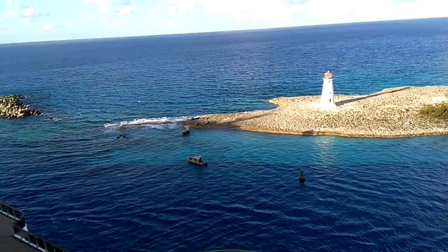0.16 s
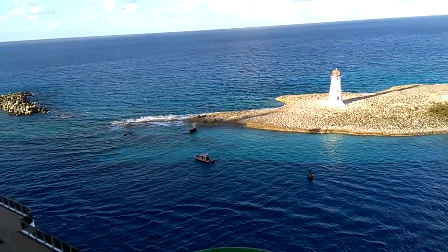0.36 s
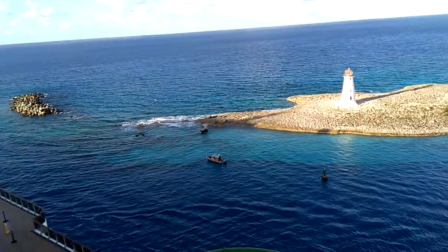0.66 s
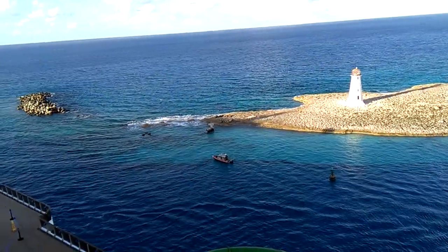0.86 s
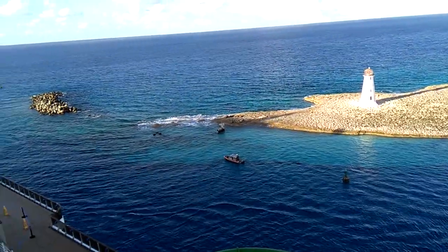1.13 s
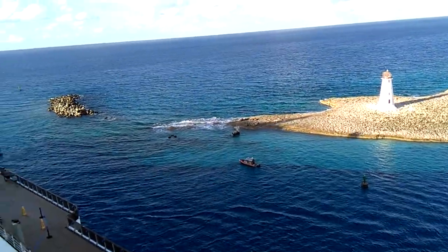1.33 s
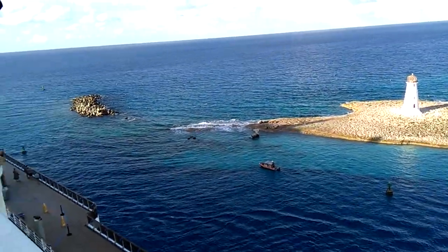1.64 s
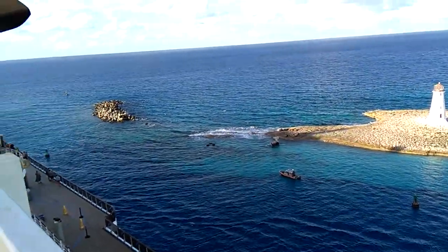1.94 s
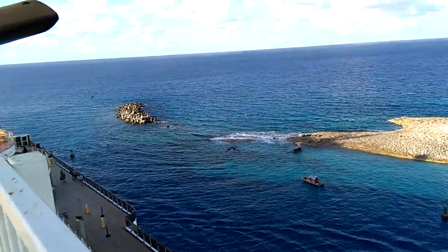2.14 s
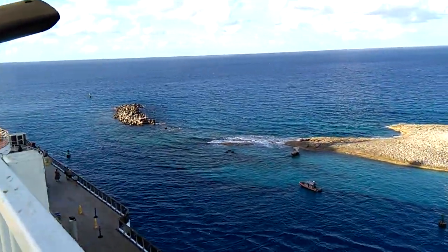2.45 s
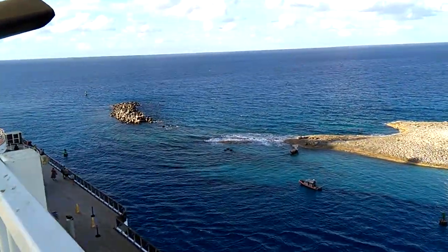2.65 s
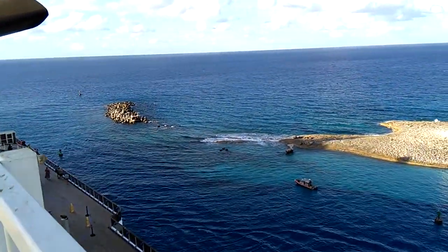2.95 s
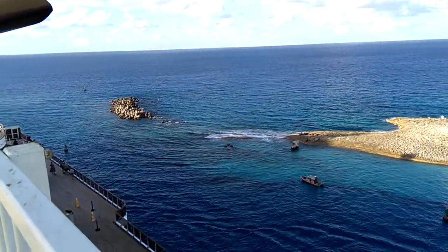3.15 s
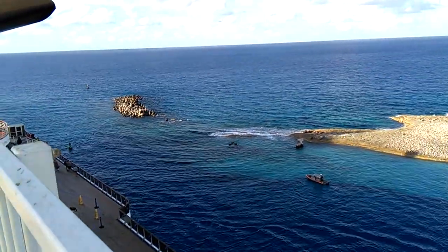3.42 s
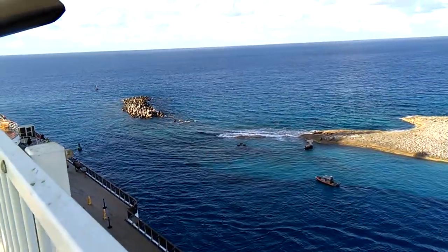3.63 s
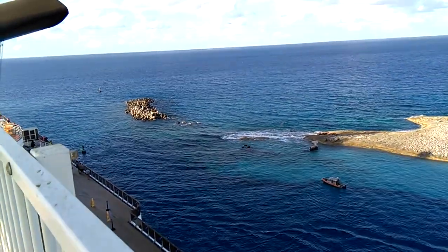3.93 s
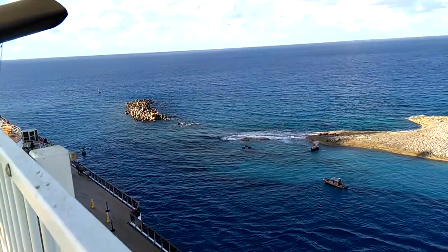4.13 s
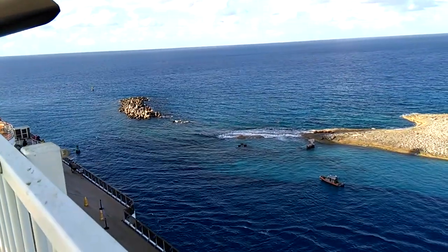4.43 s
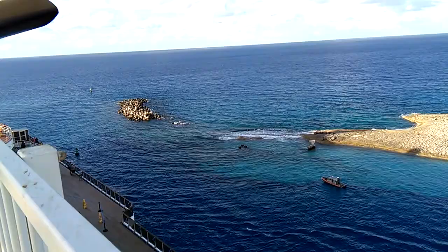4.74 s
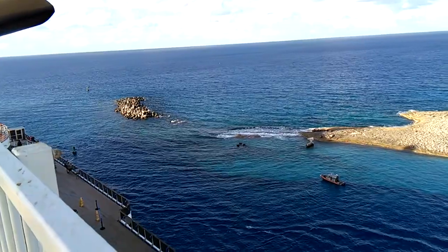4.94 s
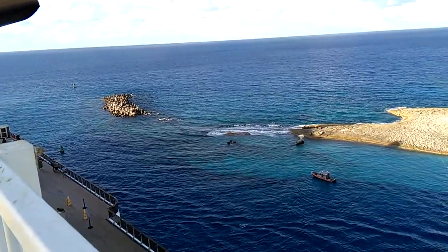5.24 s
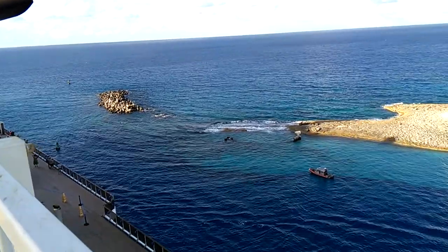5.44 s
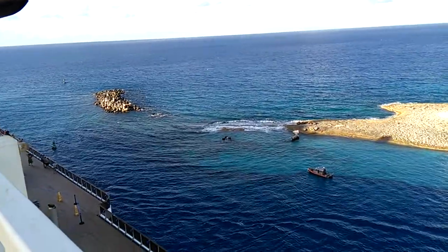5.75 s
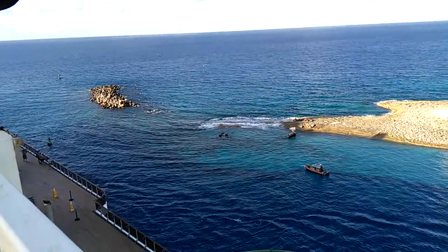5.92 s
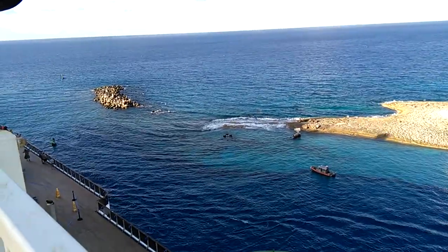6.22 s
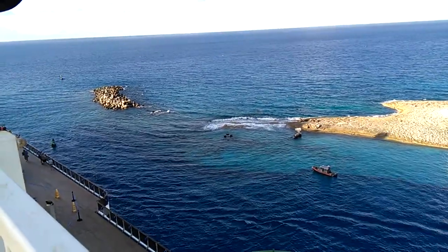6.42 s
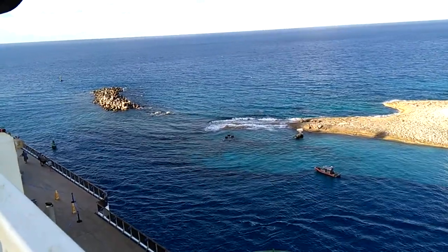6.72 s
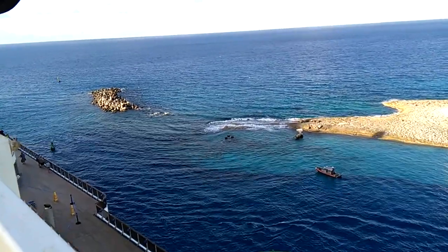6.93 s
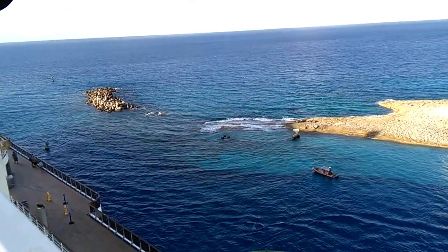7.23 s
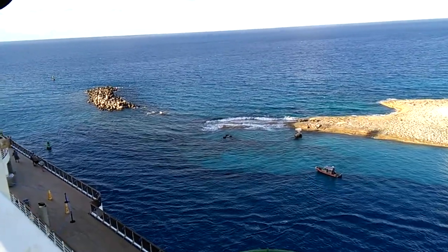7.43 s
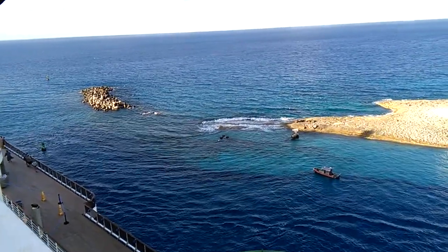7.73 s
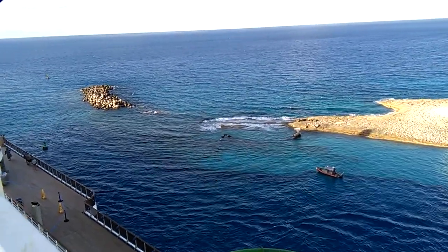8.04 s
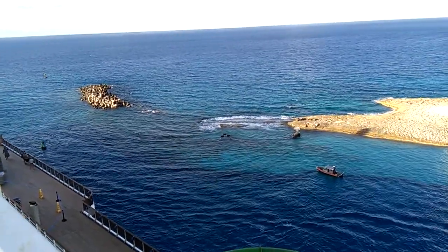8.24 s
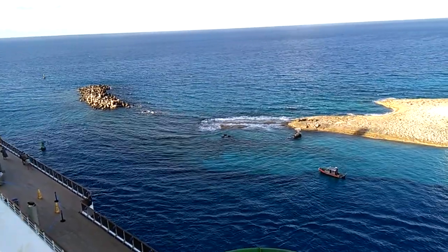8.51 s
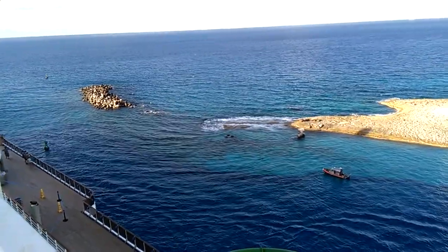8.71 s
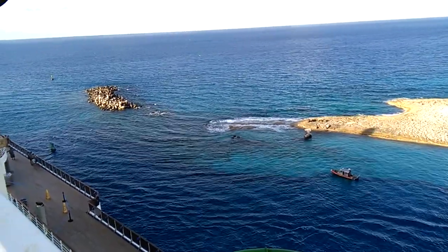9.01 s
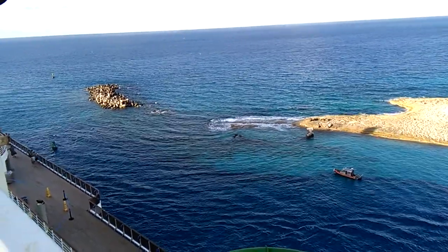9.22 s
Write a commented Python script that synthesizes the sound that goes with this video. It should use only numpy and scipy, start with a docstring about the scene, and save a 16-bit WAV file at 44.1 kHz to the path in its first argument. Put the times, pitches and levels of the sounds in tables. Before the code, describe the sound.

On the open deck of a ship, wind buffets a small microphone throughout with an uneven low rumble, soft thumps and hollow fluttering. A sharper, raspy gust hits about two seconds in, then a faint wavering whistle sounds for a second, followed by quick flaps of air. The ship's machinery hums quietly underneath, and near the end a distant wave washes very faintly.

```python
"""On the open upper deck of a ship at sea, wind buffets a small microphone.
Turbulence carries eddies of many sizes: large ones rumble and thump on the diaphragm, small ones
flutter, puff and flap across the port, which burbles and whistles by resonance.
The ship's machinery hums below; far off, water hisses and one wave breaks.
The recorder's limiter holds down the peaks."""
import sys
import numpy as np
from scipy import signal
from scipy.fft import rfft, irfft, next_fast_len
from scipy.io import wavfile
from scipy.ndimage import uniform_filter1d

SR = 44100
rng = np.random.default_rng(int(sys.argv[2]) if len(sys.argv) > 2 else 0)


def put_to_file(sound):
    """Save the sound as 16-bit audio at rate SR, in the file named by the first command-line argument."""
    columns = np.atleast_2d(sound).T  # one column per channel
    safe = np.clip(columns, -1, 1)
    whole_steps = np.round(safe * 32767)
    wavfile.write(sys.argv[1], SR, whole_steps.astype(np.int16))


N = 413216
ATTACK_SHARE = 0.6   # rise time over decay time of a burble, puff or flap
CHANCE_SPREAD_DB = 5.5   # range of level among chance events


def from_db(db):
    """Logarithmic level: every 20 dB is a factor of ten in amplitude."""
    return 10 ** (np.asarray(db) / 20)


def rms_one(x):
    """Normalisation to unit rms."""
    return x / np.sqrt(np.mean(x ** 2) + 1e-20)


def in_time(rows):
    """Linear interpolation: each column after the time, at every sample."""
    times, *columns = np.transpose(rows)
    return [np.interp(np.arange(N) / SR, times, column) for column in columns]


def drift(rate_hz):
    """A slow random process of unit rms: noise at every 40th sample through a two-pole low-pass."""
    pole = np.exp(-80 * np.pi * rate_hz / SR)
    noise = rng.standard_normal(N // 40 + 2002)
    slow = signal.lfilter([1], [1, -2 * pole, pole * pole], noise)[2000:]   # once the filter has settled
    return np.interp(np.arange(N) / 40, np.arange(len(slow)), rms_one(slow))


def band_noise(spectrum, shared_db, own_db, rate_hz):
    """Random amplitude modulation: third-octave bands swell partly together, partly alone; rms 1."""
    hz, level_db = np.transpose(spectrum)
    size = next_fast_len(N)
    bins = np.maximum(np.arange(size // 2 + 1) * SR / size, 1)
    shape_db = np.interp(np.log(bins), np.log(hz), level_db, left=-150, right=-150)
    coloured = rfft(rng.standard_normal(size)) * from_db(shape_db)
    together, out = drift(rate_hz), 0
    thirds = 3 * np.log2(bins / hz[0])
    for k in range(int(3 * np.log2(hz[-1] / hz[0])) + 2):
        weight = np.clip(1 - abs(thirds - k), 0, 1)   # overlapping slopes add up to 1
        band = irfft(coloured * weight, size)[:N]
        out = out + band * from_db(shared_db * together + own_db * drift(rate_hz))
    return rms_one(out)


def pulse(peak_s, length_s, attack=1):
    """Gaussian envelope as (samples, gains): -6 dB half a length after the peak; attack scales the rise."""
    at = np.arange(max(int((peak_s - 2 * length_s) * SR), 0), min(int((peak_s + 2 * length_s) * SR), N))
    away = 2 * (at / SR - peak_s) / length_s
    return at, from_db(-6 * np.where(away < 0, away / attack, away) ** 2)


def by_chance(count, *wind_db):
    """Uniformly random events: their times, a 0-1 draw each, and the wind levels there, randomly lowered."""
    when, draw, drop = rng.random((count, 3)).T
    at = (when * (N - 1)).astype(int)
    return at / SR, draw, *[db[at] - CHANCE_SPREAD_DB * drop for db in wind_db]


# Wind noise in four ranges: (time [s], rumble [dB], growl [dB], flutter [dB], rasp [dB])
WIND_LEVELS = [(0.0, -28.5, -35.5, -37.5, -57), (0.52, -25.5, -33.5, -37.5, -59.5),
               (1.12, -23.5, -35, -41.5, -52.5), (1.35, -22, -39.5, -43, -62.5),
               (1.84, -24.5, -35.5, -39, -57.5), (1.9, -25, -38.5, -33, -44),
               (2.2, -31.5, -38, -36.5, -49.5), (2.34, -28.5, -42, -40.5, -61),
               (2.58, -28.5, -42.5, -41, -61.5), (3.18, -27.5, -37.5, -40, -56),
               (4.3, -25.5, -35.5, -36.5, -51), (4.45, -29, -40, -37.5, -53.5),
               (5.37, -22.5, -38.5, -38, -51), (5.72, -31.5, -36, -36, -55), (6.05, -25, -36.5, -40, -61.5),
               (6.72, -30, -35, -40, -59), (7.28, -28, -32, -40.5, -58), (7.57, -24, -37, -37.5, -55),
               (8.79, -30.5, -37, -43.5, -63), (9.37, -28, -34, -37, -55.5)]
# Spectra of those ranges, largest eddies first: (frequency [Hz], relative density [dB])
RUMBLE_SPECTRUM = [(22, -41), (32, -25.5), (42, -2.5), (50, -0.5), (60, -3), (75, -2.5), (100, -8.5),
                   (150, -11), (230, -16)]
GROWL_SPECTRUM = [(90, -14.5), (140, -17.5), (230, 3), (330, 3), (480, -12)]
FLUTTER_SPECTRUM = [(300, -13), (420, 0), (530, -1.5), (700, -6), (1000, -13), (1400, -35)]
RASP_SPECTRUM = [(800, -6.5), (1100, 7.5), (1500, 4), (2000, -7), (2700, -25), (3600, -44.5)]
def buffeting():
    """Turbulent pressure fluctuation at the port: the smaller the eddy, the higher its frequencies."""
    rumble_db, growl_db, flutter_db, rasp_db = in_time(WIND_LEVELS)
    rumble = from_db(rumble_db) * band_noise(RUMBLE_SPECTRUM, shared_db=2.4, own_db=2, rate_hz=13)
    growl = from_db(growl_db) * band_noise(GROWL_SPECTRUM, shared_db=3, own_db=1, rate_hz=11)
    streaks = drift(22)   # one eddy brightens the whole middle range at once
    flutter = band_noise(FLUTTER_SPECTRUM, shared_db=-1.5, own_db=2.5, rate_hz=25)
    flutter *= from_db(flutter_db + 2.18 * streaks)
    rasp = band_noise(RASP_SPECTRUM, shared_db=1, own_db=4.5, rate_hz=34)
    rasp *= from_db(rasp_db + 1.1 * streaks)
    return rumble + growl + flutter + rasp


def wavering_tone(hz, wander_hz, rate_hz):
    """Random frequency modulation of a sine; rms 1."""
    pitch_hz = hz + wander_hz * drift(rate_hz)
    return np.sqrt(2) * np.sin(2 * np.pi * np.cumsum(pitch_hz) / SR)


# Spectral lines of the machinery: (frequency [Hz], rms wander [Hz], relative level [dB])
HUM_LINES = [(177.9, 2.5, 1), (207.4, 0.93, -4)]
# The lower line comes and goes; the upper stays near this curve's mean: (time [s], level [dB])
HUM_CURVE = [(0.0, -35), (0.96, -42), (1.09, -30), (2.48, -42), (3.7, -38.5), (9.37, -38)]
def machinery():
    """A line spectrum: two wavering hum tones, both flickering in loudness; the lower swells and fades."""
    level_db, = in_time(HUM_CURVE)
    low, high = [from_db(db + 2 * drift(13)) * wavering_tone(hz, wander_hz, rate_hz=3)
                 for hz, wander_hz, db in HUM_LINES]
    return from_db(level_db) * low + from_db(np.mean(level_db)) * high


WAVE_S, WAVE_ATTACK_S, WAVE_HOLD_S, WAVE_RELEASE_S = 7.0, 0.25, 1.39, 0.39
WASH_DB, WASH_SWELL_DB, SPRAY_DB = -72.5, 7.5, -73   # wash at rest, its rise, spray at the crest
# Spectra of distant wash and spray: (frequency [Hz], relative density [dB])
WASH_SPECTRUM = [(1500, -2), (2300, 0.5), (2550, 0.5), (2750, 1.5), (2950, -2.5), (3500, -6.5), (4200, -14)]
SPRAY_SPECTRUM = [(3700, -8), (4300, -7), (5500, -7.5), (7000, -5.5), (8600, -1.5), (10500, -7.5),
                  (12500, -10)]
def water():
    """Broadband noise of distant water: the wash swells once, and spray joins it, as a wave breaks."""
    corners_s = WAVE_S + np.cumsum([0, WAVE_ATTACK_S, WAVE_HOLD_S, WAVE_RELEASE_S])
    wave = np.interp(np.arange(N) / SR, corners_s, [0, 1, 0.92, 0])   # sags a little during the hold
    wash = band_noise(WASH_SPECTRUM, shared_db=0.7, own_db=0.5, rate_hz=11)
    spray = band_noise(SPRAY_SPECTRUM, shared_db=1.6, own_db=2, rate_hz=25)
    return from_db(WASH_DB + WASH_SWELL_DB * wave) * wash + from_db(SPRAY_DB) * wave * spray


# Spectrum of the background hiss: (frequency [Hz], relative density [dB])
HISS_SPECTRUM = [(3900, -5), (5200, -5.5), (7000, -3), (8600, 0), (10500, -2), (12500, -5), (15000, -6.5)]
def hiss(level_db=-79.5):
    """The noise floor: faint, nearly steady treble noise."""
    return from_db(level_db) * band_noise(HISS_SPECTRUM, shared_db=0.2, own_db=1.2, rate_hz=12)


THUMP_CYCLES = 1.13   # between the envelope's -6 dB points
SMALL_THUMP_HZ, SMALL_THUMP_RANGE_HZ, SMALL_THUMP_DB = 55.5, 24.7, 7.5   # lowest, span, level re rumble
# The strongest single large eddies: (time [s], frequency [Hz], level [dB])
STRONG_THUMPS = [(0.26, 79, -15.5), (.39, 150, -13), (.415, 76, -15), (0.66, 59.1, -12),
                 (0.753, 60.9, -12.5), (0.963, 77.6, -13.5), (1.02, 110, -15.5), (1.215, 60, -20),
                 (1.265, 60, -19), (1.315, 60, -19), (1.586, 69.6, -14.5), (2.414, 69.2, -16),
                 (3.13, 53.9, -18.5), (3.548, 58.2, -12), (4.73, 51.06, -11), (5.069, 89, -15.5),
                 (5.32, 62.4, -17), (6.324, 63.3, -15), (6.406, 69, -11), (6.553, 100.6, -14.5),
                 (6.648, 81.9, -15), (7.03, 119.2, -16), (7.91, 48.9, -15.5), (8.621, 67.5, -13.5)]
def thumps():
    """Forced vibration: a large eddy swings the diaphragm once or twice; small thumps come by chance."""
    rumble_db, *_ = in_time(WIND_LEVELS)
    when, draw, small_db = by_chance(18, rumble_db + SMALL_THUMP_DB)
    small = zip(when, SMALL_THUMP_HZ + SMALL_THUMP_RANGE_HZ * draw, small_db)
    out = np.zeros(N)
    for time_s, hz, level_db in [*STRONG_THUMPS, *small]:
        at, swell = pulse(time_s, THUMP_CYCLES / hz)
        out[at] += from_db(level_db) * swell * np.sin(2 * np.pi * hz * (at / SR - time_s))
    leak = signal.butter(4, 40, "high", fs=SR, output="sos")   # the port leaks slow pressure
    return signal.sosfilt(leak, out)


SMALL_BURBLE_S, SMALL_BURBLE_DB = 0.012, 0.5   # mean length, level re flutter
SMALL_BURBLE_HZ, SMALL_BURBLE_RANGE_HZ = 448, 155.8   # lowest pitch, span
# The strongest hollow blips of the port cavity: (time [s], length [s], frequency [Hz], level [dB])
STRONG_BURBLES = [(0.344, 0.037, 418, -26.5), (0.426, 0.042, 408, -28), (1.634, 0.01, 462, -26),
                  (1.93, .02, 494, -28), (1.99, 0.017, 428.4, -23), (2.029, 0.01, 503, -19),
                  (2.055, 0.0088, 430, -24), (2.108, 0.029, 500, -27), (2.157, 0.03, 466, -27.5),
                  (2.268, 0.016, 470, -30.5), (2.29, .014, 460, -29.5), (2.325, 0.035, 500, -29.5),
                  (2.367, .02, 482, -30.5), (2.415, 0.029, 688, -37), (2.467, 0.013, 545, -27.5),
                  (2.5, 0.023, 680, -35), (2.546, 0.022, 520, -28.5), (2.687, 0.0093, 560, -30),
                  (3.561, 0.023, 577, -27.5), (3.828, 0.019, 650, -26), (4.078, 0.0098, 570, -28),
                  (4.57, 0.08, 588, -31), (4.7, 0.011, 526, -22.5), (5.08, 0.016, 498, -25),
                  (5.172, 0.017, 598, -29), (5.242, 0.016, 608, -26.5), (5.491, 0.041, 537, -27.5),
                  (5.531, 0.0036, 642, -21), (5.725, 0.009, 600, -21.5), (5.753, 0.013, 558, -23),
                  (6.087, 0.013, 536, -24), (6.178, 0.012, 560, -27), (6.638, 0.017, 509, -28.5),
                  (6.918, 0.013, 515, -24.5), (7.442, 0.056, 562, -28.5), (7.602, 0.019, 541, -25.5),
                  (7.75, .03, 500, -29), (7.845, 0.04, 502, -26), (8.181, 0.013, 523, -22.5),
                  (8.272, 0.0086, 544, -27.5), (8.798, 0.013, 504, -25), (8.955, 0.012, 466, -25),
                  (9.085, 0.012, 576, -27)]
def burbles():
    """Cavity resonance: an eddy rings the port for a few unsteady cycles; small blips come by chance."""
    *_, flutter_db, rasp_db = in_time(WIND_LEVELS)
    octave = from_db(rasp_db - flutter_db + 1)   # brighter wind also sounds the octave
    when, draw, small_db = by_chance(40, flutter_db + SMALL_BURBLE_DB)
    small_hz = SMALL_BURBLE_HZ + SMALL_BURBLE_RANGE_HZ * draw
    rows = [*STRONG_BURBLES, *zip(when, SMALL_BURBLE_S * (0.5 + draw), small_hz, small_db)]
    wobble = 0.35 * np.pi * drift(22)   # phase shaken by the turbulence
    out = np.zeros(N)
    for (time_s, length_s, hz, level_db), start_turns in zip(rows, rng.random(len(rows))):
        at, swell = pulse(time_s, length_s, ATTACK_SHARE)
        phase = 2 * np.pi * (hz * at / SR + start_turns) + wobble[at]
        out[at] += from_db(level_db) * swell * (np.sin(phase) + octave[at] * np.sin(2 * phase))
    return signal.sosfilt(signal.butter(6, 1500, "low", fs=SR, output="sos"), out)


SMALL_PUFF_S, SMALL_DULL_DB, SMALL_BRIGHT_DB = 0.0061, -12.5, -7.5   # mean length, re flutter, re rasp
# The strongest puffs across the port: (time [s], length [s], dull level [dB], bright level [dB])
STRONG_PUFFS = [(0.367, 0.13, -43, -60.5), (1.65, 0.085, -40, -67), (1.925, 0.054, -32.5, -51),
                (1.98, 0.057, -27.5, -62), (2.108, .03, -32.5, -59), (2.152, 0.02, -30.5, -71),
                (3.146, 0.12, -39.5, -60), (3.564, 0.094, -36.5, -61.5), (5.132, 0.03, -49, -45.5),
                (5.3, 0.09, -41, -59), (5.646, 0.031, -34.5, -63), (7.338, 0.023, -39, -71),
                (8.5, 0.06, -40, -82), (8.977, 0.19, -41, -78)]
# Spectra of a puff's two parts: (frequency [Hz], relative density [dB])
DULL_SPECTRUM = [(500, -5.5), (900, 2), (1400, -12), (1900, -23.5), (2400, -40.5)]
BRIGHT_SPECTRUM = [(1300, 6), (1800, 12.5), (2300, 0), (2900, -10), (3400, -26.5)]
def puffs():
    """Intermittent turbulence: short bursts of dull and bright air noise; small ones come by chance."""
    *_, flutter_db, rasp_db = in_time(WIND_LEVELS)
    when, draw, *small_db = by_chance(60, flutter_db + SMALL_DULL_DB, rasp_db + SMALL_BRIGHT_DB)
    small = zip(when, SMALL_PUFF_S * (0.5 + draw), *small_db)
    dull_gain, bright_gain = np.zeros((2, N))
    for time_s, length_s, dull_db, bright_db in [*STRONG_PUFFS, *small]:
        at, swell = pulse(time_s, length_s, ATTACK_SHARE)
        dull_gain[at] += from_db(dull_db) * swell
        bright_gain[at] += from_db(bright_db) * swell
    dull = band_noise(DULL_SPECTRUM, shared_db=2.5, own_db=2.5, rate_hz=40)
    bright = band_noise(BRIGHT_SPECTRUM, shared_db=2.5, own_db=2.5, rate_hz=40)
    return dull_gain * dull + bright_gain * bright


# Sharp flaps of air: (time [s], level at the crest [dB])
SHARP_FLAPS = [(1.905, -35), (1.988, -35), (2.0294, -39), (2.149, -40.5), (2.228, -35.5), (3.959, -36.5),
               (3.9983, -39.5), (4.014, -36.5), (4.1072, -39), (4.142, -36), (4.177, -37.5), (4.221, -34.5),
               (4.237, -37), (4.266, -36.5), (4.5917, -40.5), (4.62, -34), (4.712, -34), (4.7936, -41.5),
               (4.908, -38), (4.9407, -38), (5.021, -40), (5.106, -39), (5.143, -44), (5.191, -35),
               (5.2617, -35.5), (5.5304, -40), (5.6382, -38), (5.937, -41), (7.0883, -38)]
# Spectrum of a flap: (frequency [Hz], relative density [dB])
FLAP_SPECTRUM = [(500, 3.5), (1000, 6), (1700, -5), (2400, -19), (2800, -21.5), (3200, -42.5)]
def flaps(length_s=0.010):
    """Pressure transients: air snaps at the port in noise bursts a few milliseconds long."""
    air = band_noise(FLAP_SPECTRUM, shared_db=0, own_db=2, rate_hz=40)
    out = np.zeros(N)
    for time_s, level_db in SHARP_FLAPS:
        at, swell = pulse(time_s + length_s / 2, length_s, ATTACK_SHARE)
        swell_rms = np.sqrt(np.mean(swell ** 2))
        out[at] += from_db(level_db) * swell_rms * rms_one(swell * air[at])
    return out


# Course of the port's whistle, faint at both ends: (time [s], pitch [Hz], level [dB])
WHISTLE_CURVE = [(2.72, 990, -84), (2.788, 996, -37), (2.844, 979, -49), (2.924, 1024, -41.5),
                 (3.064, 1036, -36.5), (3.15, 992, -34), (3.23, 999, -36), (3.29, 1010, -60),
                 (3.345, 985, -37.5), (3.4, 1068, -59), (3.47, 1075, -39.5), (3.55, 966, -34.5),
                 (3.61, 1030, -36.5), (3.69, 1008, -41.5), (3.83, 1060, -42.5), (3.9, 1060, -80)]
# Its bands: (multiple of the pitch [ratio], width [Hz], relative level [dB])
WHISTLE_BANDS = [(.5, 25, -6), (1, 47, -3), (1.5, 100, -19.5)]
def whistle(core=0.6):
    """Flow-excited oscillation: air across the port sings in three bands, each a tone in narrow noise."""
    hz, level_db = in_time(WHISTLE_CURVE)
    phase = 2 * np.pi * np.cumsum(hz) / SR
    tone = np.zeros(N)
    for multiple, width_hz, band_db in WHISTLE_BANDS:
        in_phase = (core + drift(width_hz)) * np.sin(multiple * phase)   # steady core plus breath
        quadrature = drift(width_hz) * np.cos(multiple * phase)
        tone += from_db(band_db) * (in_phase + quadrature)
    return from_db(level_db) * tone


def scene():
    """Superposition: all sources add at one microphone."""
    noise_floor = hiss()
    wind = buffeting() + thumps() + puffs() + flaps() + burbles() + whistle()
    return (wind + machinery() + water() + noise_floor)[None]


LIMIT, RIPPLE_DB, GAIN_STEP_HZ, CUTOFF_HZ = 0.15, -57, 6000, 14300
def record(dry):
    """Peak limiting: the gain falls as the amplitude exceeds LIMIT; a steep low-pass cuts the top."""
    excess = uniform_filter1d(np.maximum(abs(dry) / LIMIT - 1, 0), size=200)
    gain = 1 / (1 + 0.62 * uniform_filter1d(excess, size=200))
    # A ripple stands for the small steps of the limiter's gain, which leave faint pips on the peaks.
    step_phase = 2 * np.pi * GAIN_STEP_HZ * np.arange(N) / SR
    sawtooth = np.sin(step_phase) + np.sin(2 * step_phase) / 2
    ripple = from_db(RIPPLE_DB) * np.tanh(excess / 0.18) * sawtooth
    top_cut = signal.ellip(14, 0.5, 80, CUTOFF_HZ, fs=SR, output="sos")
    return signal.sosfilt(top_cut, dry * (gain + ripple))


dry = scene()
out = record(dry)
put_to_file(out)
```